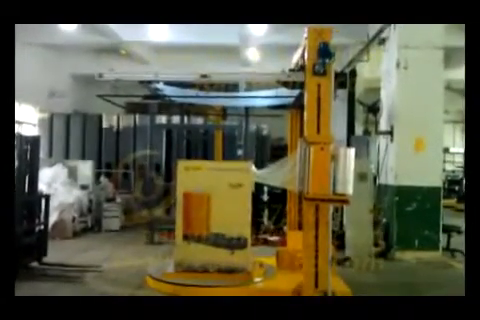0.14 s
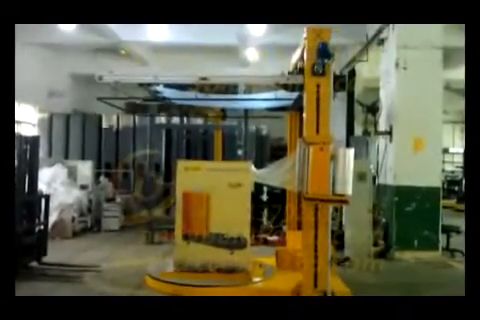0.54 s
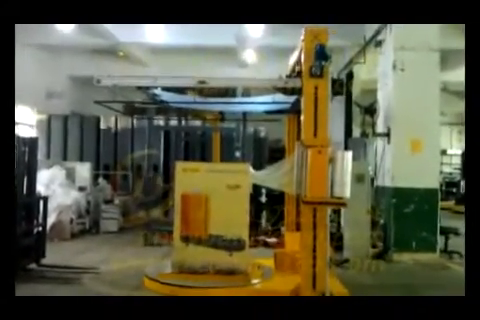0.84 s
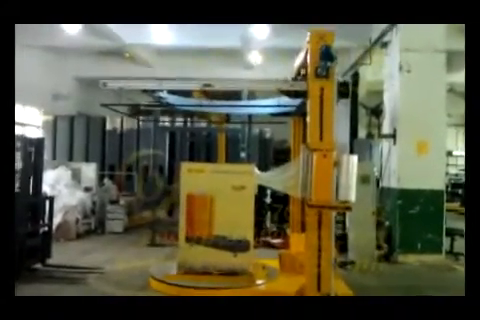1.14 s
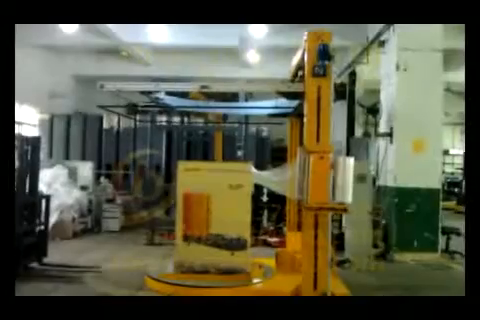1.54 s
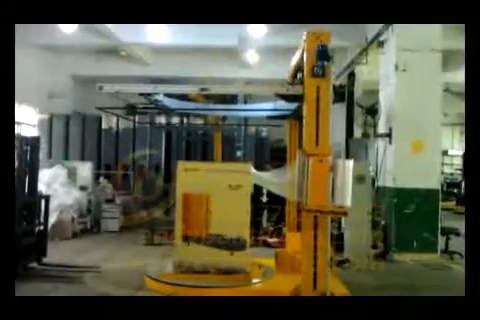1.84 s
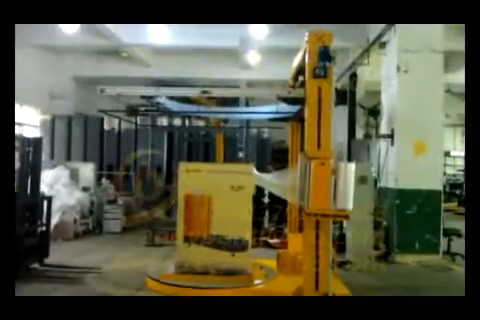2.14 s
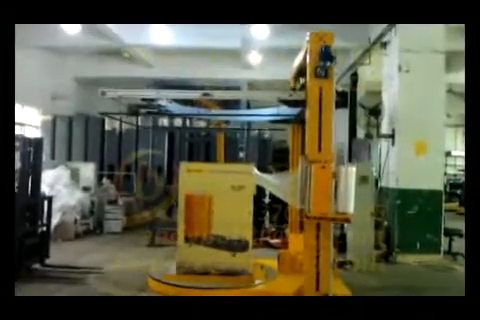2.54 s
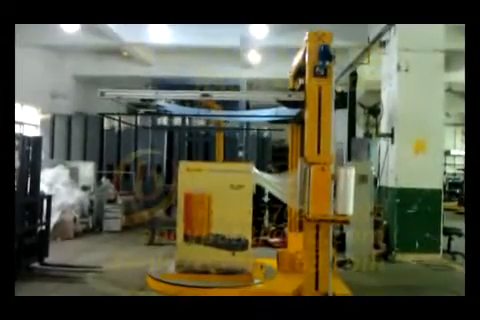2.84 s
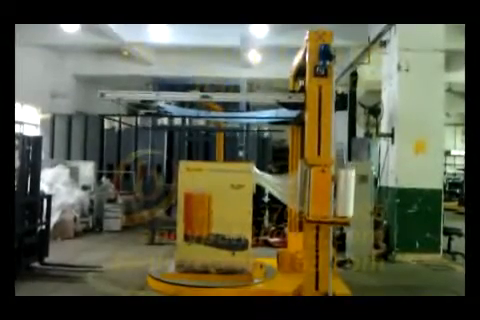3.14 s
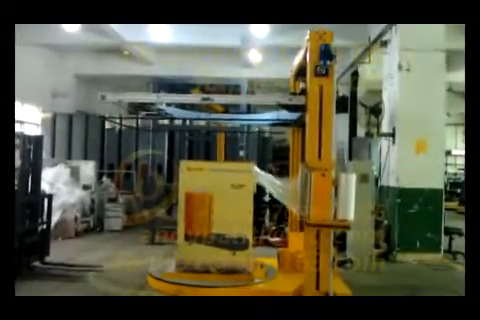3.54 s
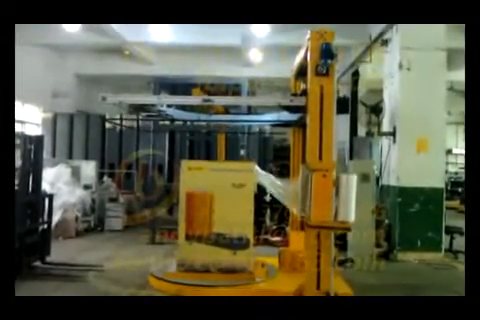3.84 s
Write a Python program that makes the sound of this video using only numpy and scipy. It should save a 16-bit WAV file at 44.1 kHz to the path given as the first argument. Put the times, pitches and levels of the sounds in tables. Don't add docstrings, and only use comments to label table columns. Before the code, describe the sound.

Sticky stretch film rips off a pallet wrapper's roll in three crackling pulls, the last ending in one hard crack, then a long hissing sweep sinks in pitch; reverberant factory hall, ventilation hum, small resonant microphone.

```python
import sys
import numpy as np
from scipy import signal
from scipy.fft import rfft, irfft
from scipy.io import wavfile
from scipy.ndimage import uniform_filter1d, map_coordinates

SR = 44100
rng = np.random.default_rng(int(sys.argv[2]) if len(sys.argv) > 2 else 0)


def unload_wav(signal):
    wavfile.write(
        sys.argv[1],
        SR,
        np.round(np.clip(np.atleast_2d(signal).T, -1, 1) * 32767).astype(np.int16),
    )


def voltage_ratio(decibels):
    exponent = np.asarray(decibels, float) / 20
    return 10 ** exponent


N = 176400
T = np.arange(N) / SR

# frequency in Hz, density in dB per Hz.
HUM_SPECTRUM = [(15, -58), (25, -28), (90, -19.5), (134, -6.5), (236, -6.5), (381, -6.5), (838, -13),
                (897, -10.5), (1500, -22), (1950, -35), (3300, -120)]
HISS_SPECTRUM = [(710, -51), (1200, -5.5), (2240, -0.5), (2600, -5.5), (4190, 0), (4800, -20),
                 (11100, -28.5), (13100, -29), (14500, -72)]
HUM_DB, HISS_DB = -44.5, -42
# centre in Hz, width in Hz, level in dB.
STEADY_MOTORS = [(4090, 18, -56), (4040, 31, -59), (306, 21, -55), (906, 30, -62.5), (360, 19, -61.5),
                 (1690, 60, -59), (2150, 30, -58)]
# centre in Hz, width in Hz, level in dB.
LATE_MOTOR = [(560, 80, -44), (273, 200, -42.5), (420, 180, -48)]
LATE_START_S = 3.75
# centre in seconds, level in dB, half length in seconds.
PUFFS = [
    (1.433, -47.5, 0.096),
    (2.686, -48.5, 0.025),
]
# frequency in Hz, density in dB per Hz.
PUFF_SPECTRUM = [(1500, -13), (4000, 9), (6000, -8), (9000, -17), (13000, -5)]

# frequency in Hz, decay time t60 in seconds.
HALL_T60 = [(200, 0.56), (1000, 1.48), (4000, 0.83), (10000, 0.19)]
HALL_DB = -11

# start in seconds, peak in
# dB, pitch in Hz, t60 in seconds.
KNOCKS = [(0.171, -35, 57, .1), (1.2, -40, 40, .07), (1.735, -31, 57, 0.055), (1.869, -27, 45, 0.08),
          (2.2, -27, 40, 0.033), (2.031, -16.5, 1200, 0.042), (2.503, -29.5, 286, 0.036),
          (3.029, -19.5, 400, 0.031), (3.027, -25, 600, .025), (.14, -20.5, 1000, 0.048),
          (.18, -23, 1000, 0.045), (3.5, -30, 260, 0.067), (3.034, -21, 214, 0.027),
          (3.032, -28, 140, 0.04)]

# time in seconds, level in dB, slowness from 0 fast to 1 slow.
SWEEP_STROKES = [
    [(2.68, -68, 0.43), (2.704, -42, 0.17), (2.738, -38.5, 0.06), (2.844, -25.5, 0.18), (3.036, -20, 0.11),
     (3.042, -27, 0.22), (3.16, -23, 0.16), (3.3, -26, 0.31)],
    [(3.3, -37, 0.4), (3.38, -24.5, 0.38), (3.478, -23, 0.51), (3.52, -28.5, 0.62), (3.642, -30.5, 1),
     (3.656, -26, 1), (3.756, -37, 0.62), (3.98, -32.5, 0.17), (4.0, -36, 0.52)],
]
# frequency in Hz, density in dB per Hz.
FAST_SWISH = [(76, -43), (130, -14), (296, -13.5), (464, -21.5), (1300, -10.5), (2100, -4), (2850, -5),
              (3800, 3), (4300, -0.5), (5260, -15), (10200, -30), (14000, -40)]
SLOW_SWISH = [(130, -27), (221, -8.5), (868, -11.5), (1450, -4), (1860, 1), (2500, -5.5), (3500, -16),
              (5200, -36), (14000, -83)]

# time in seconds, level in dB, brightness in dB per octave.
CRACK = [
    (2.015, -34, -4.5),
    (2.029, -22, -6),
    (2.033, -20.5, 4),
    (2.05, -23, -1.5),
    (2.07, -16.5, -2.5),
    (2.105, -26, 0),
    (2.125, -23.5, -2.5),
    (2.3, -40.5, -4.5),
    (2.5, -68, 5),
]
# frequency in Hz, density in dB per Hz.
RATTLE_SPECTRUM = [(120, -40), (200, -15.5), (650, -16), (1000, -4), (1240, -11), (1600, -7), (2400, -1.5),
                   (4200, -2.5), (5200, -11.5), (10000, -15), (15000, -24)]
LOAD_SPECTRUM = [(650, -19), (900, -3), (1020, -2.5), (1130, -7), (1240, 2), (1450, -17)]
LOAD_START_S, LOAD_DB, LOAD_T60_S = 2.028, -26, 0.62

# centre in seconds, level in dB, half length in seconds.
FIZZ = [
    (0.08, -41, .03),
    (.131, -37, .003),
    (0.698, -34.5, .005),
    (0.873, -44, .035),
    (1.9, -41, 0.053),
    (2.058, -43, 0.044),
    (3.15, -54.5, .2),
    (3.88, -60, .1),
]
# frequency in Hz, density in dB per Hz.
FIZZ_SPECTRUM = [(6000, -12), (7500, -1), (10000, -4), (12500, -5), (15000, -17)]

# time in seconds, peak in dB, brightness in dB per octave, t60 in seconds.
SNAPS = [(.012, -14, -1, .05), (.042, -18, 1, .05), (.104, -20, -5, .05), (.071, -12, 5, 0.082),
         (.130, -15.5, 14, 0.031), (.1755, -9, 1.5, 0.04), (.196, -24, 7, 0.045), (.229, -31.5, 16, 0.034),
         (.705, -14.5, 8, 0.04), (.711, -10.5, 2, 0.035), (.83, -18.5, -2, 0.067), (.838, -15, -1, 0.055),
         (.862, -14, -0.5, 0.094), (0.883, -16, 1, 0.044), (0.764, -19, -5, .06), (.943, -16.5, -1, 0.054),
         (1.0, -20, -3, .05), (1.05, -24, -5, 0.044), (1.736, -10, -3, 0.042), (1.752, -13.5, -4, 0.062),
         (1.775, -13, 0, 0.082), (1.841, -10, 2.5, 0.05), (1.893, -16, 2, 0.06), (1.93, -24, 0, 0.034),
         (2.031, -7.5, 11, 0.062), (2.095, -15, 2, 0.044), (2.139, -14, -2, .04), (2.167, -10, -3, 0.035),
         (2.792, -26, -3, 0.043), (3.001, -18, -2, .04), (3.021, -13, -3, .05), (3.127, -18, -4, .06)]
# frequency in Hz, density in dB per Hz.
SNAP_SPECTRUM = [(180, -55), (300, -34), (1170, 2.5), (2040, -8.5), (2520, 5), (4180, 7.5), (8190, -16),
                 (10100, -16.5), (15000, -27)]

# time in seconds, peel level in dB, brightness in dB per octave, pull on the frame in dB.
PULLS = [
    [(0.0, -22, 0.5, -19), (0.014, -21, 1, -17), (.05, -19.5, 2.5, -13.5), (.09, -22, 0, -12.5),
     (.15, -25.5, 1.5, -11), (0.2, -26, -0.5, -8), (.245, -34.5, -4.5, -12), (0.356, -59, 17, -25),
     (0.37, -73, 0, -5)],
    [(0.69, -57, 35, 0), (0.704, -28.5, 2, -31), (0.714, -19, 3.5, -20), (0.722, -27.5, 6, 5.5),
     (0.82, -29, 4.5, 9), (0.832, -25.5, 4.5, 10), (1.052, -30, -1, -21), (1.2, -54, 1, 4)],
    [(1.69, -41.5, 5, 4), (1.728, -35.5, 2, 2), (1.736, -22.5, 4, -1.5), (1.766, -25.5, 1, -1),
     (1.85, -26, 5, -1), (1.928, -24.5, 4.5, 2.5), (1.988, -35.5, -3.5, 6.5), (2.022, -41, 5, -8),
     (2.03, -25.5, -9, -4)],
]
# frequency in Hz, density in dB per Hz.
PEEL_SPECTRUM = [(500, -10.5), (1430, -9.5), (2000, 2.5), (2640, -2), (4300, -3), (5200, -14),
                 (7680, -27.5), (11100, -29), (15000, -39)]
FRAME_SPECTRUM = [(150, -16.5), (250, -7.5), (312, 11.5), (400, -6.5), (600, -7), (1100, -8)]
FRAME_DB = [4.5, -19, -5]
SLIPS_PER_S, SLIP_SCATTER_DB, SLIP_SHARE = 1100, 3, .55

# centre in Hz, width in Hz, lift in dB.
MIC_RESONANCES = [(2280, 95, 3.5), (4113, 115, 2.5), (6120, 360, 3), (9870, 1340, 4.5)]
MIC_LOW_HZ = 74.6
CEILING = .42
# frequency in Hz, threshold in standard deviations.
DROPOUT = [(4300, -2.4), (5700, -.9), (7000, -.25), (10000, -.1), (12300, .25), (13150, .8), (13500, 2.6),
           (14300, 3), (15100, 4.2), (15250, 20)]
# frequency in Hz, standard deviations per dB.
LOUD_KEEPS = [(12900, .03), (13500, .16)]


def unit(x):
    return x / np.sqrt(np.mean(x ** 2) + 1e-20)


def along(points, hz):
    f, v = np.transpose(points)
    return np.interp(np.log(hz + 1), np.log(f + 1), v)


def closed(points, hz):
    below = np.maximum(points[0][0] / (hz + 1), 1)
    above = np.maximum(hz / points[-1][0], 1)
    return along(points, hz) - 24 * np.log2(below * above)


def wobble(rate):
    knots = rng.standard_normal(int(N * rate / SR) + 4)
    return map_coordinates(knots, [np.arange(N) * rate / SR])


def texture(spectrum, patchy_db, tilt=None, share=0.0, other=None, mix=None):
    slip_signs = (rng.random(N) < SLIPS_PER_S / SR) * rng.choice([-1, 1], N)
    slips = slip_signs * voltage_ratio(SLIP_SCATTER_DB * rng.standard_normal(N))
    share = np.clip(share, 0, 1)
    source = np.sqrt(1 - share) * rng.standard_normal(N) + np.sqrt(share) * unit(slips)
    hz, t, z = signal.stft(source, SR, nperseg=512)
    patches = uniform_filter1d(rng.standard_normal(z.shape), size=5, axis=0)
    patches = uniform_filter1d(patches, size=6, axis=1)
    level_db = closed(spectrum, hz)[:, None] + np.zeros(z.shape)
    if tilt is not None:
        level_db += np.log2((hz[:, None] + 200) / 3000) * np.interp(t, T, tilt)
    if other is not None:
        blend = np.interp(t, T, np.clip(mix, 0, 1))
        level_db += (closed(other, hz)[:, None] - level_db) * blend
    gain = voltage_ratio(level_db)
    gain = gain / np.sqrt(np.mean(gain ** 2, axis=0))
    z = z * gain * voltage_ratio(patchy_db * unit(patches))
    return unit(signal.istft(z, SR, nperseg=512)[1][:N])


def controls(rows, fade_db_per_s=400):
    s, db, *cols = np.transpose(rows)
    away = np.maximum(s[0] - T, 0) + np.maximum(T - s[-1], 0)
    gain = voltage_ratio(np.interp(T, s, db) - fade_db_per_s * away)
    return [gain] + [np.interp(T, s, c) for c in cols]


def swells(rows):
    return sum(voltage_ratio(db) * np.exp(-((T - s) / half) ** 2) for s, db, half in rows)


def band(hz, width, db):
    f = np.fft.rfftfreq(N, 1 / SR)
    spectrum = rfft(rng.standard_normal(N)) / (1 + (2 * (f - hz) / width) ** 2)
    return voltage_ratio(db) * unit(irfft(spectrum, N))


def factory():
    motors = sum(band(*row) for row in STEADY_MOTORS)
    late_motor = sum(band(*row) for row in LATE_MOTOR) * np.clip(20 * (T - LATE_START_S), 0, 1)
    hum = voltage_ratio(HUM_DB + wobble(3)) * texture(HUM_SPECTRUM, patchy_db=1.5)
    hiss = voltage_ratio(HISS_DB + 0.88 * wobble(10)) * texture(HISS_SPECTRUM, patchy_db=0.4)
    puffs = swells(PUFFS) * texture(PUFF_SPECTRUM, patchy_db=-1.0)
    return hum + hiss + motors + late_motor + puffs


def hall(x):
    hz, t, z = signal.stft(rng.standard_normal(SR), SR, nperseg=256)
    decay = voltage_ratio(-60 * t / along(HALL_T60, hz)[:, None])
    tail = signal.istft(z * decay, SR, nperseg=256)[1]
    delayed = np.pad(x, (700, 0))
    return signal.fftconvolve(delayed, tail / np.linalg.norm(tail))[:N]


def knocks():
    out = np.zeros(N)
    for s, db, hz, t60 in KNOCKS:
        u = np.maximum(T - s, 0)
        attack = 1 - np.exp(-u / 0.0012)
        out += voltage_ratio(db - 60 * u / t60) * np.sin(2 * np.pi * hz * u) * attack
    return out


def sweep():
    gain, slowness = controls(SWEEP_STROKES[0] + SWEEP_STROKES[1][1:])
    swish = texture(FAST_SWISH, patchy_db=2.0, share=0.21, other=SLOW_SWISH, mix=slowness)
    return gain * voltage_ratio(0.59 * wobble(24.64)) * swish


def crack():
    gain, tilt = controls(CRACK, fade_db_per_s=301)
    u = np.maximum(T - LOAD_START_S, 0)
    ring = voltage_ratio(LOAD_DB - 60 * u / LOAD_T60_S) * (1 - np.exp(-u / 0.0017))
    load = ring * texture(LOAD_SPECTRUM, patchy_db=2.5)
    rattle = texture(RATTLE_SPECTRUM, patchy_db=0.5, tilt=tilt, share=0.18)
    return load + gain * voltage_ratio(1.6 * wobble(50)) * rattle


def fizz():
    return swells(FIZZ) * texture(FIZZ_SPECTRUM, patchy_db=1.0, share=0.36)


def snaps():
    gain = np.zeros(N)
    tilt = np.interp(T, *np.transpose(sorted(SNAPS))[[0, 2]])
    for s, db, _, t60 in SNAPS:
        u = np.maximum(T - s + 0.0023, 0)
        attack = 1 - np.exp(-u / 0.0016)
        gain += voltage_ratio(db - 7 - 60 * u / max(t60, .005)) * attack
    return gain * texture(SNAP_SPECTRUM, patchy_db=2.0, tilt=tilt, share=0.1)


def pulls():
    out = np.zeros(N)
    for rows, frame_db in zip(PULLS, FRAME_DB):
        gain, tilt, pull_db = controls(rows)
        peel = voltage_ratio(0.5 * wobble(40)) * texture(PEEL_SPECTRUM, patchy_db=1.8, tilt=tilt, share=SLIP_SHARE)
        frame = voltage_ratio(frame_db + pull_db) * texture(FRAME_SPECTRUM, patchy_db=2.5)
        out += gain * (peel + frame)
    return out


def scene():
    near = pulls() + fizz() + snaps() + crack() + sweep() + knocks()
    return (near + voltage_ratio(HALL_DB) * hall(near) + factory())[None]


def microphone(x):
    hz = np.fft.rfftfreq(N, 1 / SR)
    lift_db = sum(db / (1 + (2 * (hz - c) / w) ** 2) for c, w, db in MIC_RESONANCES)
    bass_cut = hz ** 2 / (hz ** 2 + MIC_LOW_HZ ** 2)
    x = irfft(rfft(x) * bass_cut * voltage_ratio(lift_db - 1.5), N)
    return CEILING * np.tanh(x / CEILING)


def dropouts(x):
    hz, t, z = signal.stft(x, SR, nperseg=1536, noverlap=1152)
    field = uniform_filter1d(rng.standard_normal(z.shape[1:]), size=3, axis=0)
    field = uniform_filter1d(field, size=8, axis=1)
    treble_db = 10 * np.log10(np.mean(abs(z[0, hz > 5000]) ** 2, axis=0) + 1e-20)
    loudness = along(LOUD_KEEPS, hz)[:, None] * (treble_db - treble_db.mean())
    keep = unit(field) + loudness > along(DROPOUT, hz)[:, None]
    return signal.istft(z * keep, SR, nperseg=1536, noverlap=1152)[1][:, :N]


def roll_off(x):
    return signal.sosfilt(signal.butter(12, 15260, fs=SR, output="sos"), x)


def record(dry):
    return roll_off(dropouts(microphone(dry)))


dry = scene()
out = record(dry)
unload_wav(out)
```